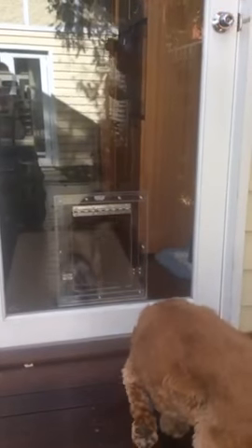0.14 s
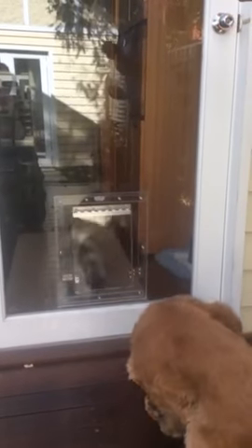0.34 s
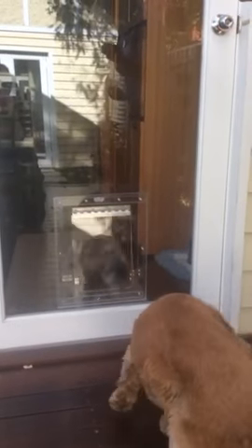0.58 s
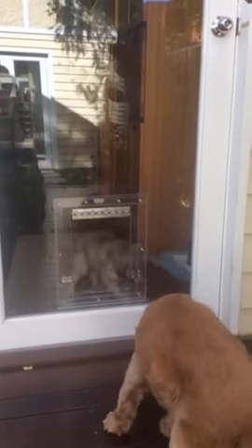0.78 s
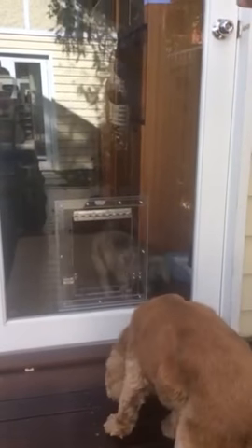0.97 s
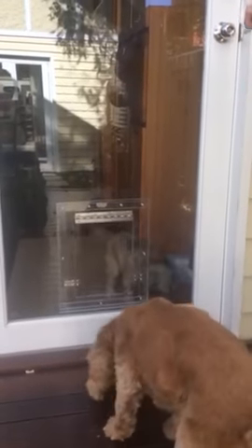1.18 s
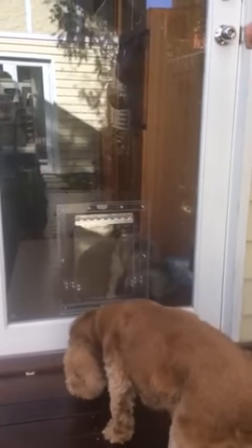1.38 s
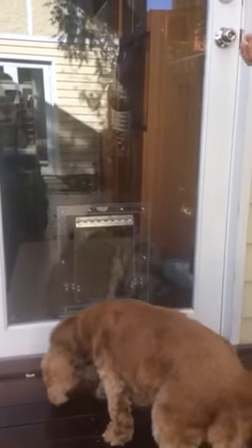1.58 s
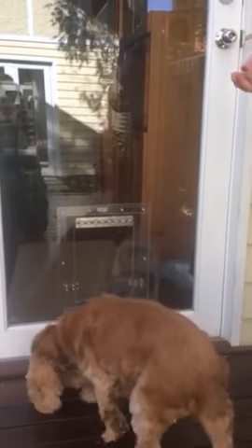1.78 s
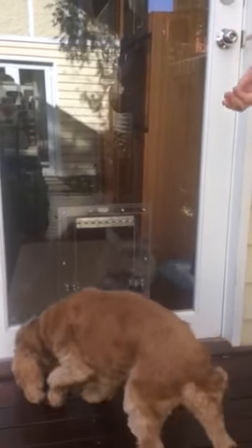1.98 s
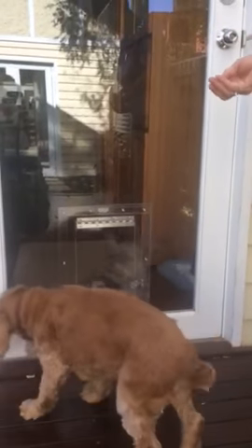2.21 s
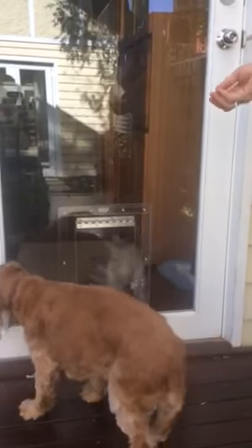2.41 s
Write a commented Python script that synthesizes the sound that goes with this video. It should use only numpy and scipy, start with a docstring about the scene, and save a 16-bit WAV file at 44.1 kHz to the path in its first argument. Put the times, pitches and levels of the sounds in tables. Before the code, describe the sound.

Close outdoor pickup of a pet door flap knocking hard in its frame and chattering to rest, then a dog's light footfalls, small clicks and brushing scuffs on deck boards over very quiet air.

```python
"""A glass door above a wooden deck: a plastic pet flap set in it swings shut and clacks in its frame.
Each contact is cracks and snaps of coloured noise over decaying modes; soft shoves make the pane boom.
The flap chatters to rest. Faint ticks (noise clicks, short rings), dull footfalls and grainy scuffs
follow, probably a dog's claws, paws and fur; quiet outdoor noise flickers underneath."""
import sys
import numpy as np
from scipy import signal
from scipy.fft import rfft, irfft, next_fast_len
from scipy.io import wavfile
from scipy.ndimage import uniform_filter1d

SR = 44100
rng = np.random.default_rng(int(sys.argv[2]) if len(sys.argv) > 2 else 0)


def store_wav(level_fs):
    """Save 16-bit WAV to argv[1]."""
    pcm = np.round(np.clip(np.atleast_2d(level_fs), -1, 1) * 32767)
    wavfile.write(sys.argv[1], SR, pcm.T.astype(np.int16))


N = 108045
T = np.arange(2 ** 15) / SR  # time axis of one struck sound [s]
KNOCK_RISE_S, TICK_RISE_S = 0.00088, 0.00063  # rise time constants


def undb(db):
    """Decibels to amplitude gain."""
    return 10 ** (np.asarray(db) / 20)


def fade(t60_s, rise_s=1e-4):
    """Envelope: exponential rise (time constant rise_s) and decay (60 dB in t60_s)."""
    rising = np.minimum(T / max(rise_s, 1e-5), 30)
    falling = np.minimum(np.log(1000) * T / max(t60_s, 1e-3), 30)
    return (1 - np.exp(-rising)) * np.exp(-falling)


def add(out, time_s, sound):
    """Mix a sound in from time_s, cut at the end of the scene."""
    start = int(np.clip(time_s * SR, 0, N - 1))
    out[start:start + len(sound)] += sound[:N - start]


def read(table, hz, col=1):
    """Interpolate a table column on a log-frequency axis."""
    rows = np.array(table, float)
    return np.interp(np.log(hz + 1), np.log(rows[:, 0]), rows[:, col])


def noise(db_at, size=len(T)):
    """Gaussian noise of rms 1, its spectrum shaped by db_at(hz)."""
    spectrum = rfft(rng.standard_normal(size))
    hz = np.linspace(0, SR / 2, size // 2 + 1)
    x = irfft(spectrum * undb(db_at(hz)), size)
    return x / np.std(x)


def hump(centre_hz, half_width_octaves):
    """Noise in one broad resonance, 6 dB down at the half-width."""
    def db_at(hz):
        offset = np.log2((hz + 1) / centre_hz) / half_width_octaves
        return -20 * np.log10(1 + offset ** 2)
    return noise(db_at)


def bands(table, size=len(T)):
    """Coloured noise of rms 1 in total, split into overlapping octaves: (Hz, band) pairs."""
    whole = rfft(noise(lambda hz: read(table, hz), size=size))
    octave = np.log2(np.clip(np.linspace(0, SR / 2, size // 2 + 1), 32, 16384))
    pairs = []
    for k in range(5, 15):
        weight = np.maximum(1 - abs(octave - k), 0)  # triangular; neighbours sum to 1
        pairs.append((2. ** k, irfft(whole * weight, size)))
    return pairs


def dense_ring(table, rise_s):
    """Crowded modes as noise, each octave decaying at its own rate."""
    return sum(band * fade(read(table, hz, col=2), rise_s) for hz, band in bands(table))


def ring(modes, rise_s):
    """Separate modes as decaying sines."""
    return sum(undb(db) * np.sin(2 * np.pi * hz * T) * fade(t60_s, rise_s) for hz, db, t60_s in modes)


def walk(rate_hz):
    """Smoothed random steps at rate_hz, scaled to standard deviation 1."""
    hold = int(SR / rate_hz)
    steps = np.repeat(rng.standard_normal(N // hold + 1), hold)
    x = uniform_filter1d(steps, hold)[:N]
    return x / np.std(x)


def air():
    """Outdoor background: low distant rumble and hiss, each octave flickering slightly on its own."""
    # background spectrum: (frequency [Hz], relative density [dB per Hz])
    air_spectrum = [(20, -22), (40, -6), (72, 2.5), (110, -3), (200, -7.5), (400, -10), (750, -10.5),
                    (1500, -14.5), (2600, -15.5), (4500, -17.5), (7000, -23.5), (10000, -22.5),
                    (15000, -29)]
    level_db, flicker_db, flicker_hz = -58, 0.47, 16
    octaves = bands(air_spectrum, size=next_fast_len(N, True))
    return undb(level_db) * sum(band[:N] * undb(flicker_db * walk(flicker_hz)) for _, band in octaves)


def scuffs():
    """Friction, probably paws and fur: half-sine swells of resonant noise with a grainy level."""
    # soft scuffs and scrapes: (time [s], level [dB], length [s], centre [Hz], half-width [octaves])
    scuff_events = [(0.584, -61.5, .12, 3800, 1), (0.651, -60.5, 0.044, 850, 0.66),
                    (0.863, -67, 0.092, 7000, 1.5), (0.952, -64, 0.13, 1170, 0.53),
                    (1.111, -63.5, 0.087, 900, 1.2), (1.197, -67, 0.1, 11000, 0.76),
                    (1.358, -61.5, 0.12, 2680, 1.2), (1.51, -65, .11, 2500, 1.2),
                    (1.772, -57.5, 0.035, 1160, 0.52), (1.898, -56, 0.034, 3170, 2.1),
                    (2.187, -57, 0.055, 4270, 0.67), (2.224, -63.5, 0.064, 4000, 0.52)]
    grain_db, grain_hz = 1.5, 250
    out = np.zeros(N)
    for time_s, level_db, length_s, centre_hz, half_width_octaves in scuff_events:
        swell = np.sin(np.pi * np.minimum(T / length_s, 1))
        add(out, time_s, undb(level_db) * swell * hump(centre_hz, half_width_octaves))
    return out * undb(grain_db * walk(grain_hz))


def paws():
    """Soft pads excite the boards' crowded modes; one dull thud repeats at different levels."""
    # paws set down on the boards: (time [s], level [dB])
    step_events = [(0.47, -54.5), (0.59, -58), (0.88, -55.5), (0.94, -55.5), (1.11, -52.5), (1.287, -56),
                   (1.318, -51.5), (1.511, -63), (1.853, -53.5), (2.196, -53)]
    # thud of the boards: (frequency [Hz], relative density [dB per Hz], t60 [s])
    board_modes = [(50, -7, 0.45), (100, -2.5, 0.33), (183, 0, 0.15), (363, -6, 0.26), (695, -14, 0.24),
                   (1520, -19, .15), (5000, -28, 0.11)]
    out = np.zeros(N)
    thud = dense_ring(board_modes, rise_s=0.0026)
    for time_s, level_db in step_events:
        add(out, time_s, undb(level_db) * thud)
    return out


def porch(direct):
    """House wall and deck reflect a sound: delayed convolution with a unit-energy dense decay."""
    # reflections: (frequency [Hz], relative density [dB per Hz], t60 [s])
    porch_decay = [(150, 0, 0.48), (1000, 1.5, 0.5), (4000, 0, .3), (15000, -1.5, 0.21)]
    level_db, delay_s = -12, 0.014
    echo = dense_ring(porch_decay, rise_s=0.0029)
    echo /= np.linalg.norm(echo)
    out = np.zeros(N)
    add(out, delay_s, undb(level_db) * signal.fftconvolve(direct, echo)[:N])
    return out


def ticks():
    """Hard taps: a noise click, a dull knock and three short modes of the spot, plus reflections."""
    # ticks: (time [s], click level [dB], click centre [Hz], knock level [dB], ring t60 [s],
    # then three modes, each frequency [Hz], level [dB])
    tick_events = [(0.6610, -49.5, 4400, -52, 0.056, 1730, -59, 3220, -51, 4650, -56),
                   (0.7490, -53, 3000, -62, .04, 815, -55, 2510, -55, 3900, -57),
                   (0.7535, -45, 3360, -55, 0.081, 820, -47, 2360, -49, 2510, -46),
                   (0.7635, -49, 2430, -48, 0.085, 753, -48, 942, -50, 1787, -54),
                   (1.4060, -64, 3000, -62, .07, 2170, -57, 2570, -53, 3500, -72),
                   (1.5630, -51, 4400, -67, .06, 2546, -46.5, 3550, -56, 4750, -54),
                   (1.8852, -40, 5450, -49, .035, 1790, -46.5, 3820, -37.5, 5970, -47),
                   (1.8880, -44, 2780, -51, 0.047, 3190, -40.5, 4750, -43.5, 7150, -51),
                   (1.8925, -52, 4000, -51, 0.026, 2200, -47, 3880, -40.5, 5650, -51),
                   (2.1800, -44, 4500, -49.5, 0.043, 848, -44.5, 1257, -43.5, 1338, -49.5)]
    # dull knock under a tick: (frequency [Hz], relative density [dB per Hz])
    knock_spectrum = [(120, -12), (330, 0), (550, -2), (850, 0.5), (1400, -5), (2400, -4.5), (4000, -3),
                      (10000, -35)]
    click_half_width_octaves = 0.6
    click_shape = fade(t60_s=0.04, rise_s=TICK_RISE_S)
    knock_shape = fade(t60_s=0.064, rise_s=KNOCK_RISE_S)
    out = np.zeros(N)
    for time_s, click_db, centre_hz, knock_db, t60_s, *pairs in tick_events:
        click = undb(click_db) * click_shape * hump(centre_hz, click_half_width_octaves)
        knock = undb(knock_db) * knock_shape * noise(lambda hz: read(knock_spectrum, hz))
        modes = [(hz, db, t60_s) for hz, db in zip(pairs[::2], pairs[1::2])]
        add(out, time_s, click + knock + ring(modes, TICK_RISE_S))
    return out + porch(out)


def shoves():
    """The swinging flap shoves the door softly: pane modes boom and the frame rumbles."""
    # shoves: (time [s], boom level [dB], rumble level [dB])
    shove_events = [(0.142, -53.5, -71), (0.194, -51.5, -43.5), (0.2126, -31, -35), (0.246, -42.5, -44),
                    (0.333, -47, -44)]
    # glass pane: (frequency [Hz], relative level [dB], t60 [s])
    pane_modes = [(74.7, -11.5, 0.94), (138.3, -8, 0.46), (160.8, -10, .55), (202.2, -1.5, 0.27),
                  (265.3, -12, 0.32), (331.7, -16.5, 0.44), (373.4, -14.5, 0.28)]
    # frame rumble: (frequency [Hz], relative density [dB per Hz], t60 [s])
    frame_modes = [(80, 0.5, 0.13), (200, 1, 0.23), (450, -1, 0.11), (750, 3, 0.097), (1130, -3, 0.087),
                   (1600, -22, .1), (5000, -20, 0.1)]
    rise_s = 0.0031
    pane, frame = ring(pane_modes, rise_s), dense_ring(frame_modes, rise_s)
    out = np.zeros(N)
    for time_s, boom_db, rumble_db in shove_events:
        add(out, time_s, undb(boom_db) * pane + undb(rumble_db) * frame)
    return out


def flap():
    """Each contact with the frame cracks, snaps plastic on plastic and rings flap, frame and door."""
    # contacts: (time [s], body knock level [dB], plastic snap level [dB])
    contact_events = [(0.157, -56.5, -52), (0.189, -50.5, -49), (0.2180, -34.5, -31.5), (0.2214, -33, -28),
                      (0.227, -28, -55), (0.2305, -35, -60), (0.238, -46, -36), (0.2535, -39.5, -38),
                      (0.2665, -38.5, -37.5), (0.283, -42, -58), (0.327, -45, -49), (0.356, -68, -48.5),
                      (0.384, -53, -49), (0.404, -54, -48)]
    # flap and its frame: (frequency [Hz], relative level [dB], t60 [s])
    flap_modes = [(422, -10.5, 0.54), (494.6, -9, 0.67), (582, -14.5, 0.46), (635, -11, 0.42),
                  (724, 0, 0.2), (820, -11, 0.26), (849, -11, 0.41), (1096, -15.5, 0.43),
                  (1448, -22.5, 0.45), (1935, -14, 0.23), (2167, -3.5, 0.11), (2270, -8, 0.25),
                  (2800, -11, 0.24), (3172, -16.5, 0.22)]
    # whole door: (frequency [Hz], relative density [dB per Hz], t60 [s])
    door_modes = [(60, -10, 1), (195, 3, 0.49), (450, 3.5, 0.39), (790, -2, .48), (1120, -6.5, 0.57),
                  (1410, -15.5, .45), (2180, -6, 0.43), (3200, -10, .36), (4530, -14.5, 0.34),
                  (8000, -24, 0.54), (15000, -28, 0.52)]
    # short crack of each knock: (frequency [Hz], relative density [dB per Hz])
    crack_spectrum = [(100, -8), (400, 3), (780, 6.5), (1400, -7), (2300, -6), (3400, -4), (5500, -18.5),
                      (15000, -30)]
    # snap of plastic on plastic: (frequency [Hz], relative density [dB per Hz])
    snap_spectrum = [(300, -17), (1300, 0), (2300, 4), (4000, -2), (5800, 2.5), (9000, -2.5), (15000, -5)]
    ring_db, door_db, crack_db, snap_tail_db = -4.5, -6, 0.5, -17  # relative to knock or snap level
    body = undb(ring_db) * ring(flap_modes, KNOCK_RISE_S)
    crack_shape = undb(crack_db) * fade(t60_s=0.05, rise_s=KNOCK_RISE_S)
    snap_tail = undb(snap_tail_db) * fade(t60_s=0.24, rise_s=KNOCK_RISE_S)
    snap_shape = fade(t60_s=0.024, rise_s=TICK_RISE_S) + snap_tail
    out = np.zeros(N)
    for time_s, knock_db, snap_db in contact_events:
        door = undb(door_db) * dense_ring(door_modes, KNOCK_RISE_S)
        crack = crack_shape * noise(lambda hz: read(crack_spectrum, hz))
        snap = snap_shape * noise(lambda hz: read(snap_spectrum, hz))
        add(out, time_s, undb(knock_db) * (body + door + crack) + undb(snap_db) * snap)
    return out


def scene():
    """Sum of background, scuffs, footfalls, ticks, shoves and flap contacts, as one channel."""
    return (air() + scuffs() + paws() + ticks() + shoves() + flap())[None]


def record(dry):
    """The microphone loses the deepest bass and the recorder cuts the top."""
    bass_cut_hz, top_hz = 40, 15300
    high_pass = signal.butter(2, bass_cut_hz, "high", fs=SR, output="sos")
    low_pass = signal.ellip(10, .2, 70, top_hz, fs=SR, output="sos")  # 0.2 dB ripple, 70 dB stop
    return signal.sosfilt(low_pass, signal.sosfilt(high_pass, dry))


dry = scene()
out = record(dry)
store_wav(out)
```